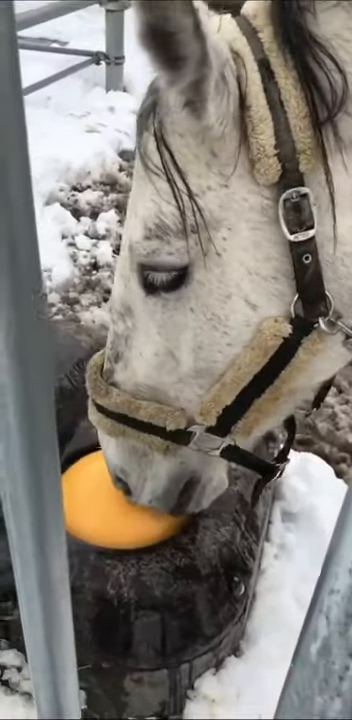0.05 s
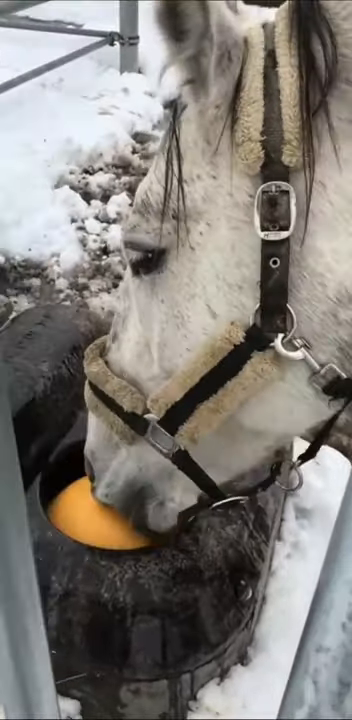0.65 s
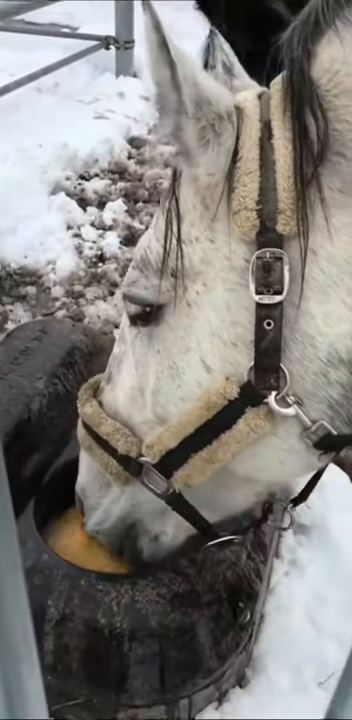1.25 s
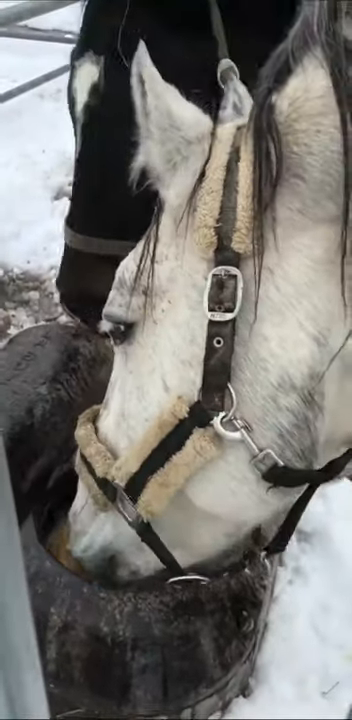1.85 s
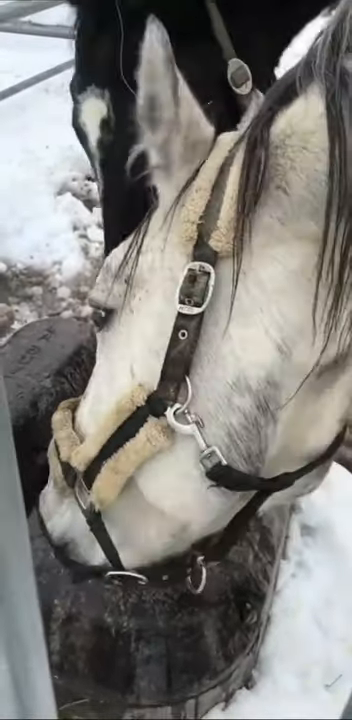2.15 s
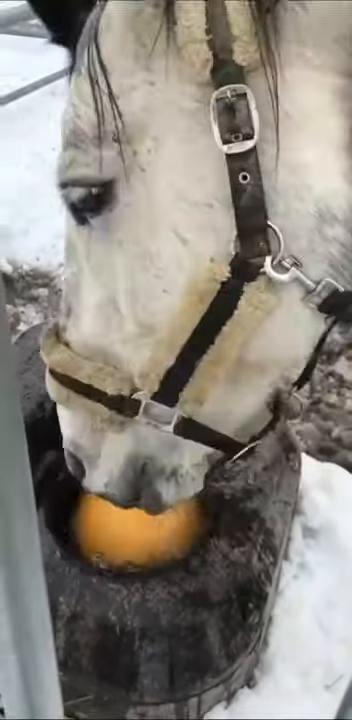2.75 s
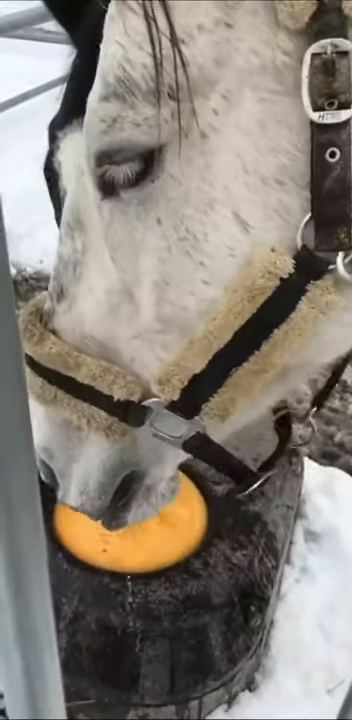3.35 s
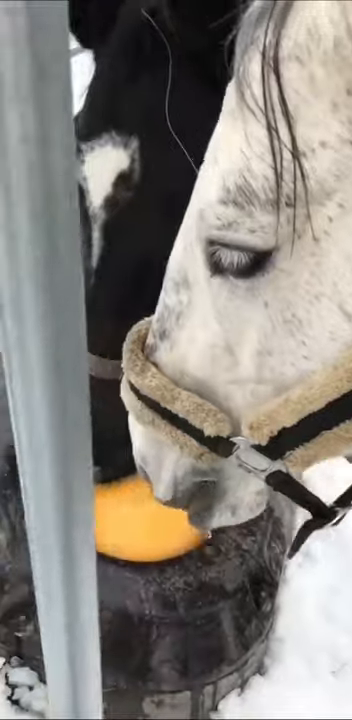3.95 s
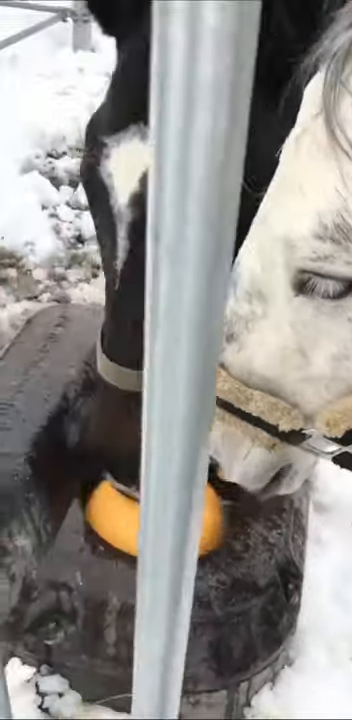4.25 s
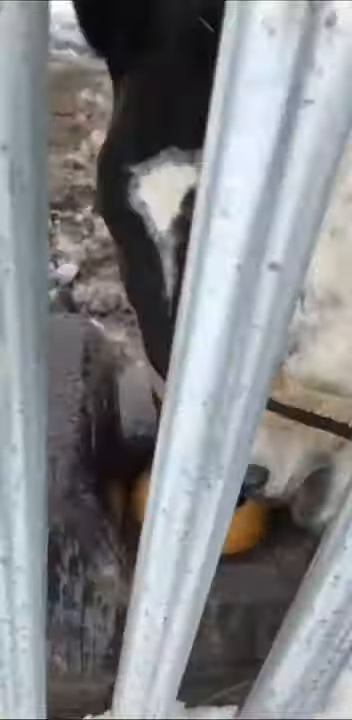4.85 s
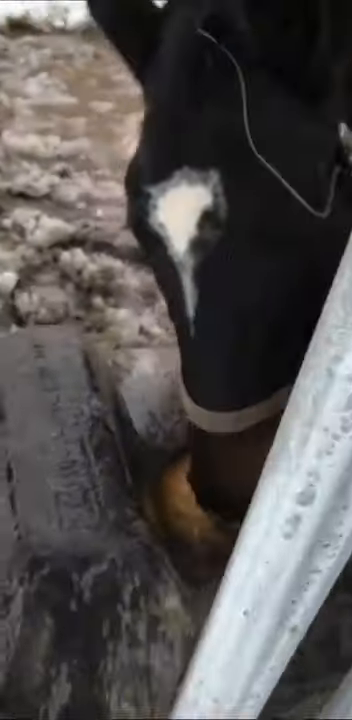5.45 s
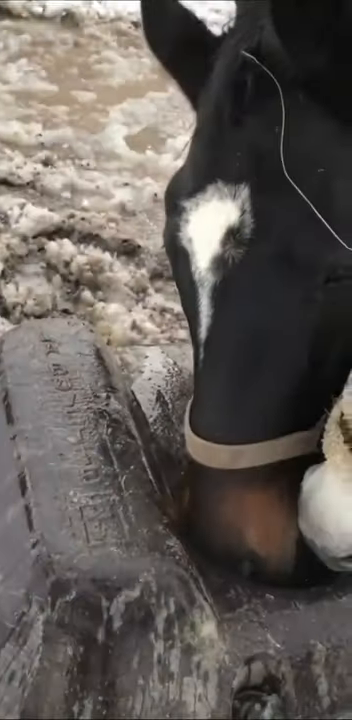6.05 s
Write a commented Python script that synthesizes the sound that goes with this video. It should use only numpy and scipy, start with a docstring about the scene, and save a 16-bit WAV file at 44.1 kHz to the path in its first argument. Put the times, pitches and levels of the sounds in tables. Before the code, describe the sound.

Two horses drink from a plastic ball drinker in a quiet winter paddock, heard from about a metre away. Water laps and plops while wet lips rub and smack. The ball knocks sharply on the rim and short, hissing slurps begin. Then the water churns and the hollow tank booms as the ball plunges. A second hard knock follows, and smacks, plops and lighter knocks carry on.

```python
"""Two horses drink from a plastic ball drinker in a snowy paddock, about a metre away.
Over quiet winter air, water laps and wet lips rub the bobbing ball; air pockets plop and lips smack.
At 0.7 s the nosed ball knocks on the rim, and short, hissing slurps begin. From 1.8 s the ball
plunges and the hollow tank booms. The water churns hardest near 2.4 s, a hard knock lands at 3.1 s
and the last slurp follows; smacks, plops and lighter knocks carry on to about 6 s."""
import sys
import numpy as np
from scipy import signal
from scipy.fft import rfft, irfft
from scipy.io import wavfile
from scipy.ndimage import uniform_filter1d, map_coordinates

SR = 44100
rng = np.random.default_rng(int(sys.argv[2]) if len(sys.argv) > 2 else 0)


def int16_out(signal):
    """Quantize to a 16-bit WAV file."""
    q = np.round(np.clip(np.atleast_2d(signal).T, -1, 1) * 32767)
    wavfile.write(sys.argv[1], SR, q.astype(np.int16))


N = 272538
T = np.arange(N) / SR
TOP_HZ = 9650

# Levels in the tables are cue levels, ahead of each layer's own trims.
# tone of the winter air: frequency_hz, level_db
AIR_SPECTRUM = [(25, 8.5), (60, 17.5), (150, 8.5), (400, 0.5), (1100, -0.5), (2200, -20.5), (5000, -36),
                (9800, -39.5)]
# how restless lips and water are between movements: time_s, level_db
UNREST_CURVE = [(0, -54), (.3, -55), (.66, -58), (.9, -50.5), (1.2, -63.5), (1.5, -55.5), (1.73, -58.5),
                (2.05, -50), (2.28, -64), (2.45, -52.5), (3.2, -47.5), (3.5, -54), (3.87, -52.5),
                (4.05, -46.5), (4.26, -56.5), (4.6, -51.5), (4.95, -57.5), (5.45, -56), (5.92, -57),
                (6.18, -52)]
# a muzzle shoves the water: start_s, length_s, splash_db, gurgle_db
MUZZLE_SHOVES = [(0.192, 0.17, -51, -54.5), (0.4, 0.12, -55.5, -56), (0.513, 0.047, -47.5, -50),
                 (0.74, 0.052, -57, -48), (0.943, 0.14, -51, -48.5), (1.228, 0.014, -47.5, -52),
                 (1.28, 0.035, -47, -48.5), (1.761, 0.017, -46.5, -48.5), (1.897, 0.06, -45.5, -54),
                 (2.021, 0.049, -46.5, -44.5), (2.165, 0.014, -51.5, -55.5), (2.338, 0.033, -35.5, -34),
                 (2.39, 0.059, -45, -50), (2.466, 0.032, -47.5, -37), (2.54, 0.045, -49.5, -40.5),
                 (2.585, 0.12, -42.5, -50), (2.884, 0.014, -43, -50.5), (3.026, 0.046, -45.5, -44.5),
                 (3.105, 0.031, -36.5, -47), (3.328, 0.038, -57, -47.5), (3.695, 0.044, -45.5, -49.5),
                 (3.852, 0.022, -47, -46.5), (3.897, .05, -63, -67), (4.027, 0.033, -43.5, -41),
                 (4.205, 0.02, -43.5, -47.5), (4.303, 0.0081, -44, -51), (4.513, 0.055, -49, -48.5),
                 (4.64, 0.014, -41, -37), (4.708, 0.018, -41, -41), (4.747, 0.072, -51, -46.5),
                 (4.82, 0.094, -56, -56.5), (4.985, 0.088, -52, -49), (5.109, 0.028, -68, -46),
                 (5.215, 0.031, -51, -45.5), (5.289, 0.098, -50, -43.5), (5.428, 0.24, -53, -54),
                 (6.013, 0.03, -66, -50)]
# wet lips rub over the ball: start_s, length_s, level_db
LIP_RUBS = [(.07, 0.12, -58.5), (.185, 0.17, -48.5), (.52, 0.056, -47.5), (.85, 0.23, -49.5),
            (1.09, 0.2, -59.5), (1.37, 0.21, -54.5), (1.58, 0.12, -60), (1.79, 0.33, -50.5),
            (2.36, 0.3, -49), (2.88, 0.19, -51), (3.115, 0.084, -40), (3.242, 0.011, -49.5),
            (3.34, 0.028, -44.5), (3.602, 0.02, -57), (3.65, 0.036, -51), (3.7, 0.021, -53),
            (3.99, 0.058, -50), (4.16, 0.034, -48), (4.365, 0.055, -48.5), (4.54, 0.022, -46.5),
            (4.71, 0.15, -52.5), (5.05, 0.049, -58), (5.12, 0.018, -49.5), (5.222, 0.02, -50.5),
            (5.29, 0.5, -52.5), (5.82, 0.056, -73), (5.63, 0.11, -52), (6.01, 0.21, -61.5)]
# tone of the wet hiss: frequency_hz, level_db
HISS_SPECTRUM = [(150, 2), (500, -30), (1000, 10.5), (1600, 0.5), (2300, 1), (3400, 1.5), (5000, -1.5),
                 (6200, -1), (7800, -5), (9800, -4.5)]
# the ball is pressed down and bobs on the tank's air: start_s, length_s, level_db
BALL_BOBS = [(.05, 0.077, -45.5), (.41, 0.048, -48.5), (1.67, 0.02, -51), (2.31, 0.1, -40),
             (2.47, 0.18, -45.5), (2.81, 0.028, -54), (2.98, 0.062, -47), (3.1, 0.095, -40),
             (3.62, 0.27, -47), (3.97, 0.14, -42.5), (4.45, 0.13, -45), (4.65, 0.087, -48),
             (5.03, 0.15, -49.5), (5.24, 0.17, -40.5)]
# larger air pockets close in the water; the rows near 3.91 s and 4.78 s are dull lip clicks that ring the same
# way: start_s, level_db, pitch_hz, t60_s
AIR_POCKETS = [(0.16, -45.5, 606, .035), (.207, -44, 1170, 0.028), (0.262, -45, 1190, 0.043),
               (0.301, -43, 1200, 0.02), (.32, -42, 1200, 0.021), (.418, -43, 850, 0.03),
               (.44, -48, 296, 0.09), (.458, -49, 348, 0.04), (.53, -45, 328, .05),
               (.547, -29.5, 1390, 0.011), (.551, -35, 1520, 0.015), (.553, -37.5, 284, .055),
               (.572, -63, 330, .04), (.604, -43.5, 215, .055), (0.621, -51, 1220, .025),
               (.759, -30.5, 466, 0.022), (.871, -44, 690, .025), (.956, -43, 970, 0.029),
               (.993, -38.5, 204, 0.033), (1.031, -39.5, 967, 0.03), (1.098, -37.5, 863, .03),
               (1.349, -41.5, 1060, .025), (1.784, -38, 800, 0.017), (1.92, -37, 1420, 0.021),
               (2.345, -31.5, 480, .03), (2.349, -35, 249, 0.045), (2.361, -29.5, 370, 0.06),
               (2.367, -31.5, 258, .045), (2.38, -35.5, 528, .06), (2.401, -35, 1222, 0.039),
               (2.421, -35, 1004, 0.027), (2.422, -44, 520, 0.046), (2.476, -29.5, 525, 0.038),
               (2.478, -42, 306, 0.032), (2.491, -33.5, 553, 0.051), (2.524, -30, 581, .045),
               (2.526, -34, 310, .05), (2.572, -34.5, 363, .045), (2.574, -37, 1220, .025),
               (2.625, -38, 690, .03), (2.649, -34, 378, .03), (2.651, -35.5, 850, .025),
               (2.654, -38.5, 1700, .025), (2.668, -32, 1306, .028), (2.887, -38.5, 1590, 0.021),
               (3.039, -40, 740, .025), (3.054, -36, 750, .025), (3.39, -37, 1290, 0.021),
               (3.697, -45, 1340, 0.023), (3.906, -41.5, 2180, .02), (4.035, -35.5, 1010, 0.0219),
               (4.048, -41, 1400, 0.026), (4.057, -39.5, 655, 0.028), (4.14, -35.5, 1430, 0.012),
               (4.147, -32, 1005, .018), (4.21, -38.5, 870, .035), (4.218, -34, 1020, 0.034),
               (4.229, -35.5, 785, 0.022), (4.313, -40.5, 910, 0.023), (4.326, -37, 915, 0.023),
               (4.59, -44, 840, 0.02), (4.653, -37, 385, 0.043), (4.657, -37, 260, .05),
               (4.713, -35, 867, .03), (4.725, -41, 260, .045), (4.759, -36.5, 307, 0.048),
               (4.782, -40.5, 1750, 0.02), (4.783, -41, 310, 0.041), (4.87, -44.5, 308, .06),
               (4.916, -45, 1090, 0.034), (4.922, -42, 1470, 0.025), (5.007, -43, 362, 0.04),
               (5.117, -33, 282, 0.025), (5.137, -39, 313, 0.05), (5.362, -40.5, 445, 0.041),
               (5.425, -38.5, 1520, 0.024), (5.435, -43, 1130, 0.023), (5.555, -41, 1320, 0.014),
               (5.613, -39.5, 268, 0.035)]
# lips and tongue part (a low Q snaps, a high Q squeaks):
# start_s, click_db, click_hz, mouth_db, mouth_hz, click_t60_s, click_q
LIP_SMACKS = [(.192, -46.5, 5960, -52, 1200, .025, 8), (.446, -48.5, 5550, -52, 1200, .013, 15),
              (.492, -47, 4400, -33, 877, .054, 10), (.693, -45, 3780, -38.5, 730, .014, 11),
              (.732, -37.5, 6300, -42, 1130, .014, 11), (.756, -33, 5390, -46, 460, .02, 20),
              (.8525, -42, 5430, -50, 1400, .006, 2.2), (1.286, -39.5, 5650, -45, 630, .025, 14),
              (1.475, -35, 3150, -41, 1210, .013, 5.1), (1.761, -38, 6500, -48, 1220, 0.021, 2.7),
              (1.841, -44, 3400, -57, 1500, .008, 5), (2.315, -32.5, 4450, -43, 1480, .011, 8.2),
              (2.692, -33, 3000, -33.5, 1080, 0.02, 6), (2.734, -35.5, 2760, -33, 1710, .021, 8.1),
              (2.764, -42, 7900, -46, 1190, .014, 10), (2.81, -39.5, 4600, -53, 517, .017, 14),
              (2.915, -40, 8550, -56, 1500, .019, 12), (2.9325, -31.5, 4400, -57, 1770, 0.01, 17),
              (3.108, -29.5, 4800, -24, 1350, .028, 8.8), (3.165, -42, 7000, -36, 1380, .015, 11),
              (3.603, -41.5, 2700, -48, 1010, .032, 7), (3.64, -43.5, 2610, -50, 940, .0073, 11),
              (3.653, -39.5, 2670, -48.5, 1030, .009, 11), (3.67, -41, 3860, -49, 1490, .018, 10),
              (3.702, -44, 3880, -50, 1300, .028, 11), (3.717, -36, 2830, -44, 1310, .014, 8),
              (3.964, -49, 5800, -55, 1370, .012, 11), (4.012, -44, 4020, -52, 895, .009, 8),
              (4.274, -45, 3450, -34, 2110, .02, 12), (4.288, -43.5, 4330, -40, 670, .02, 36),
              (4.307, -34.5, 4340, -34, 980, .024, 8.8), (4.328, -42.5, 3720, -55, 1510, .014, 18),
              (4.367, -43, 4150, -57, 1800, .03, 25), (4.383, -40, 4240, -47, 1800, .02, 33),
              (4.5436, -25, 3000, -29, 2000, 0.01, 1.8), (4.741, -42.5, 3950, -54, 900, .0083, 11),
              (4.7725, -28.5, 3600, -48, 1320, .008, 12), (4.784, -46, 2390, -49, 900, .012, 11),
              (4.815, -49, 4000, -46, 1410, .008, 4.6), (5.025, -40.5, 3600, -34, 530, .01, 3.9),
              (5.053, -48, 6600, -63, 700, .015, 11), (5.079, -44.5, 3050, -58, 590, .017, 12),
              (5.135, -43, 4550, -41.5, 1580, .036, 12), (5.192, -42, 4470, -50, 1920, .015, 14),
              (5.263, -44.5, 2180, -47, 1920, .018, 11), (5.285, -49, 4600, -45, 1290, .02, 20),
              (5.2922, -28.5, 3900, -31, 2010, 0.016, 1.3), (5.418, -46, 4870, -51, 1500, .015, 20),
              (5.4232, -33.5, 4930, -39, 1500, .02, 8.9), (5.49, -45.5, 5540, -56, 1510, .012, 13),
              (5.642, -31.5, 3320, -50, 1730, .008, 9.8), (5.67, -40, 6340, -52, 1500, .013, 11),
              (6.025, -44.5, 2450, -42, 1420, .014, 15), (6.063, -47.5, 4530, -68, 1500, .012, 12),
              (6.114, -44, 2730, -57, 1300, .018, 8.8)]
# the ball hits the rim, each spot favouring a range of pitches:
# start_s, ring_db, spot_hz, breadth_octaves, crack_db, decay_ratio
RIM_KNOCKS = [(0.7035, -12.5, 980, 0.58, -25.5, 1.03), (1.761, -31, 715, 0.45, -51, 1.6),
              (2.3124, -35.5, 415, 0.67, -44, 0.98), (2.482, -27, 706, 1.04, -63, 1.6),
              (3.112, -12.5, 1710, 0.23, -18, 1.4), (3.858, -31, 1550, 0.41, -74, 0.86),
              (4.225, -27, 1280, 1.13, -43, 0.92), (4.5438, -21.5, 1900, 3.4, -32, 0.45),
              (4.6415, -30.5, 850, 1.2, -47, 1.6), (4.7112, -31.5, 980, 1.2, -44, 0.59),
              (4.755, -35, 1400, 1.6, -61, 1.9), (4.806, -37, 600, 1.3, -48, 0.99),
              (5.730, -34, 746, 0.95, -43, 1.1), (5.7352, -37, 895, 0.64, -59, 0.9),
              (5.825, -35.5, 815, 0.66, -44, 0.41)]
# resonances of the wet plastic ball and rim: pitch_hz, level_db, t60_s
PLASTIC_MODES = [(381, 6, 0.13), (511, 9.5, 0.041), (653, 10, 0.018), (772, 8, 0.019), (960, 24, 0.0045),
                 (1160, 7.5, 0.02), (1238, 12.5, 0.015), (1445, 1.5, 0.058), (1586, 10.5, 0.022),
                 (1810, -21, 0.0096), (2240, 18.5, 0.013), (2870, -1, 0.012), (3600, 27, 0.011),
                 (4200, -19, 0.018)]
# air and water drawn through the lips, whose opening scales the gap's pitches:
# start_s, length_s, level_db, fall_db, opening_ratio
SLURPS = [(0.75, 0.028, -33.5, 0.5, 0.94), (0.927, 0.065, -43.5, -2.5, 0.94),
          (1.029, 0.048, -42, -0.5, 0.83), (1.288, 0.1, -37, 7.5, 0.86), (1.758, 0.031, -40, 6, 0.96),
          (1.858, 0.095, -43, -4, 0.92), (2.038, 0.054, -55, -12.5, 0.89), (2.344, 0.056, -46, -10, 1.2),
          (3.367, 0.026, -39.5, -3.5, 1.7)]
# resonances of the wet gap between lips and ball: pitch_hz, q, level_db
LIP_GAP_MODES = [(523, 4.4, 1), (1006, 3.9, 9.5), (1400, 6.7, -1), (3500, 5, 2), (4400, 4.3, -1.5),
                 (5570, 11, -9), (7250, 3.4, -8.5), (9130, 23, 2.5)]
# the ball plunges and the tank's air booms: start_s, pitch_hz, level_db, t60_s
TANK_BOOMS = [(1.764, 113, -43, 0.071), (2.041, 147, -32, 0.078), (2.091, 158, -38, 0.097),
              (2.31, 175, -30, 0.023), (2.352, 104, -27.5, 0.067), (2.483, 116.5, -25, 0.1),
              (2.538, 113, -29.5, 0.065), (2.575, 105, -40.5, 0.11), (3.117, 166, -25, 0.046),
              (3.118, 224, -27.5, 0.068), (3.139, 159.6, -19, 0.11), (3.35, 69.4, -31, 0.18),
              (4.035, 78.4, -38, 0.14), (4.065, 62, -29.5, 0.17), (4.229, 70.3, -39.5, 0.23),
              (4.656, 71, -31.5, 0.15), (4.733, 71, -34.5, 0.24), (5.61, 165, -40.5, 0.044),
              (5.731, 199, -40, 0.038), (5.827, 194, -42, 0.049)]


def undb(db):
    """Decibels to gain."""
    return 10 ** (np.asarray(db) / 20)


def unit(x):
    """Scale to rms 1."""
    return x / np.sqrt(np.mean(x ** 2))


def burst(x, db):
    """Scale a one-shot so that its loudest 5 ms have this level."""
    return x * undb(db) / np.sqrt(uniform_filter1d(x ** 2, 220).max())


def add(out, start_s, x):
    """Mix x into out from start_s."""
    i = int(np.clip(start_s * SR, 0, N - 1))
    out[i:i + len(x)] += x[:N - i]


def fade(t, t60):
    """Exponential decay by 60 dB in t60."""
    return np.exp(-np.log(1000) * t / t60)


def attack(t, rise_s):
    """Rounded onset from 0 towards 1."""
    return 1 - np.exp(-(t / rise_s) ** 2)


def band(x, hz, q):
    """One resonance, gain 1 at its centre."""
    return signal.lfilter(*signal.iirpeak(min(hz, SR / 4), max(q, .5), fs=SR), x)


def coloured_noise(samples, spectrum):
    """Noise shaped by an EQ curve, at rms 1."""
    hz, db = np.transpose(spectrum)
    bins_hz = np.maximum(np.fft.rfftfreq(samples, 1 / SR), 1)
    eq = undb(np.interp(np.log(bins_hz), np.log(hz), db))
    return unit(irfft(rfft(rng.standard_normal(samples)) * eq, samples))


def walk(rate_hz):
    """Smooth random drift at rms 1."""
    hold = int(SR / rate_hz)
    steps = np.repeat(rng.standard_normal(N // hold + 1), hold)[:N]
    return unit(uniform_filter1d(uniform_filter1d(steps, hold), hold))


def contact(t, rise_s, t60, tail_db, tail_t60):
    """A gritty wet contact: a fast burst of noise and a weak spatter after it."""
    envelope = attack(t, rise_s) * (fade(t, t60) + undb(tail_db) * fade(t, tail_t60))
    return envelope * rng.standard_normal(len(t))


def bubble(hz, cycles, glide):
    """An air pocket rings for some cycles, its pitch rising as it nears the surface."""
    t60 = cycles / hz
    t = T[:int(t60 * SR) + 2]
    phase = 2 * np.pi * hz * t * (1 + glide * t / t60 / 2)
    return np.sin(phase) * fade(t, t60) * (1 - np.exp(-t * hz * 2))


def bubble_stream(low_hz, high_hz, cycles, glide, spread_db, count):
    """A bed of small bubbles of random pitch and size, at rms 1."""
    out = np.zeros(N)
    for when, pitch, chance in rng.random((count, 3)):
        hz = low_hz * (high_hz / low_hz) ** pitch
        size_db = -spread_db * np.log(max(chance, .03))
        add(out, when * N / SR, undb(size_db) * np.sqrt(hz) * bubble(hz, cycles, glide))
    return unit(out)


def crackle(low_hz, high_hz, spread_db, count):
    """Small films of water tear one by one, each with its own pitch and size, at rms 1."""
    out = np.zeros(N)
    for when, pitch, chance in rng.random((count, 3)):
        hz = low_hz * (high_hz / low_hz) ** pitch
        size_db = -spread_db * np.log(max(chance, .05))
        snap = band(contact(T[:1024], .001, .012, -30, .03), hz, q=4)
        add(out, when * N / SR, burst(snap, size_db))
    return unit(out)


def strokes(cues, rise_s, t60):
    """Envelope of a run of movements: each builds, holds and dies away."""
    power = np.zeros(N)
    for start_s, length_s, db in cues:
        t = T[:int((length_s + t60) * SR)]
        envelope = np.minimum(t / rise_s, 1) * fade(np.maximum(t - length_s, 0), t60)
        add(power, start_s, (undb(db) * envelope) ** 2)
    return np.sqrt(power)


def unrest():
    """Envelope of the small stirrings between movements."""
    return undb(np.interp(T, *np.transpose(UNREST_CURVE)))


def winter_air(level_db=-61):
    """A quiet, dark bed of air whose level drifts slightly."""
    return coloured_noise(N, AIR_SPECTRUM) * undb(level_db + walk(5))


def water_churn(surface_lap_db=-6.5, deep_lap_db=-8):
    """Water laps; each shove stirs small bubbles at the surface and larger ones under the ball."""
    shoves = np.array(MUZZLE_SHOVES)
    surface = strokes(shoves[:, [0, 1, 2]], rise_s=.0039, t60=.18)
    deep = strokes(shoves[:, [0, 1, 3]], rise_s=.0039, t60=.18)
    splash = bubble_stream(550, 2000, cycles=18, glide=.15, spread_db=3.2, count=2000)
    gurgle = bubble_stream(140, 600, cycles=7, glide=.15, spread_db=3, count=1400)
    splash *= np.hypot(surface, undb(surface_lap_db) * unrest())
    gurgle *= np.hypot(deep, undb(deep_lap_db) * unrest())
    return splash + gurgle


def lip_rubs(rest_db=-2, flutter_db=3.5, hiss_db=-1.95, crackle_db=-9, fizz_db=-9):
    """Wet lips hiss, crackle and fizz with tiny bubbles, louder as they rub over the ball."""
    rubbing = strokes(LIP_RUBS, rise_s=.0011, t60=.13)
    hiss = coloured_noise(N, HISS_SPECTRUM) * undb(flutter_db * walk(60))
    films = crackle(1500, 9500, spread_db=3.7, count=440)
    fizz = bubble_stream(2200, 9500, cycles=110, glide=.02, spread_db=2.7, count=2000)
    texture = undb(hiss_db) * hiss + undb(crackle_db) * films + undb(fizz_db) * fizz
    return texture * np.hypot(undb(rest_db) * unrest(), rubbing)


def ball_bobs(tank_hz=65, waver=.1516, rest_db=-87, slop_db=-9):
    """The tank's lowest air note wavers as the gap round the ball opens and shuts; water slops."""
    motion = np.hypot(strokes(BALL_BOBS, rise_s=.016, t60=.4), undb(rest_db))
    phase = 2 * np.pi * np.cumsum(tank_hz * (1 + waver * walk(45))) / SR
    slop = band(rng.standard_normal(N), hz=100, q=3.4)
    slop = unit(band(slop, hz=100, q=3.4))
    rumble = unit(np.sin(phase) * undb(3.8 * walk(30)))
    return (rumble + undb(slop_db) * slop) * motion


def water_plops(glide=.076, twin_db=-9, splash_db=-11):
    """An air pocket pinches off and sings a rising note, with a smaller twin and a little splash."""
    out = np.zeros(N)
    twins = rng.random((len(AIR_POCKETS), 2))
    for (start_s, db, hz, t60), (smaller, later) in zip(AIR_POCKETS, twins):
        note = bubble(hz, hz * t60, glide)
        note *= attack(T[:len(note)], .056 * t60)
        add(out, start_s, burst(note, db))
        twin = bubble(hz * (1.2 + .6 * smaller), hz * t60, glide)
        add(out, start_s + .27 * t60 * later, burst(twin, db + twin_db))
        splash = band(contact(T[:4096], .003, .04, -30, .09), hz * 1.3, q=1.8)
        add(out, start_s, burst(splash, db + splash_db))
    return out


def lip_smacks(upper_db=-5, spray_db=-6, droplet_db=-8, shred_db=-12, hollow_db=-3, pop_db=-9.5):
    """A water film snaps: a bright click and tiny bubbles, answered by the hollow between the lips."""
    out, t = np.zeros(N), T[:4096]
    for start_s, click_db, click_hz, mouth_db, mouth_hz, t60, q in LIP_SMACKS:
        # the quicker the film tears, the sharper the click
        snap = contact(t, .024 * t60, t60, -26, .047)
        spray = contact(t, .067 * t60, t60, -28.5, .068)
        # the lip slit rings at its own pitch and, more weakly, at two higher ones
        ratios = rng.uniform([1.3, 1.9], [1.7, 2.6])
        upper = sum(band(spray, min(click_hz * ratio, .95 * TOP_HZ), q) for ratio in ratios)
        click = unit(band(snap, click_hz, q)) + undb(upper_db) * unit(upper)
        click += undb(spray_db) * unit(band(spray, hz=7300, q=2.1))
        add(out, start_s, burst(click, click_db))
        for pitch, delay in rng.random((3, 2)):
            droplet = bubble(2200 * 4 ** pitch, cycles=90, glide=.03)
            add(out, start_s + .37 * t60 * delay, burst(droplet, click_db + droplet_db))
        # shreds of the film tear after the main snap
        for pitch, delay in rng.random((2, 2)):
            shred = band(contact(t[:512], .0002, .004, -30, .01), click_hz * (.6 + pitch), q=8)
            add(out, start_s + t60 / 2 + .022 * delay, burst(shred, click_db + shred_db))
        hollow = band(contact(t, .001, .025, -22, .05), mouth_hz, q=5)
        add(out, start_s, burst(hollow, mouth_db + hollow_db))
        # the hollow opens as the lips part, so its pitch flicks upward
        pop = bubble(mouth_hz, cycles=39, glide=.11)
        add(out, start_s + .00072, burst(pop, mouth_db + pop_db))
    return out


def rim_knocks(cushion_s=.000896, scrape=.025, rebound=.18, rebound_s=.0063, crack_trim_db=-1):
    """Each blow rings the modes near the struck spot's pitch, with a crack of plastic on top."""
    out, t = np.zeros(N), T[:8192]
    for start_s, ring_db, spot_hz, octaves, crack_db, decay_ratio in RIM_KNOCKS:
        ring = np.zeros(len(t))
        for hz, mode_db, t60 in PLASTIC_MODES:
            weight = undb(mode_db) / (1 + (np.log2(hz / spot_hz) / octaves) ** 2) ** 2
            ring += weight * np.cos(2 * np.pi * hz * (t - cushion_s)) * fade(t, t60 * decay_ratio)
        ring *= attack(t, cushion_s)  # a film of water cushions the push
        # the ball hits, skids briefly on the rim and touches once more
        force = scrape * contact(t, .00047, .013, -41.5, .1)
        force[0] += 1
        force[int(rebound_s * SR)] += rebound
        knock = signal.fftconvolve(force, ring)[:len(t)]
        add(out, start_s, burst(knock, ring_db))
        crack = band(contact(t, .0006, .021, -40, .079), hz=2560, q=.5)
        add(out, start_s, burst(crack, crack_db + crack_trim_db))
    return out


def sputter(rate_hz, spread_db):
    """Envelope of air breaking through water in uneven little spurts, at rms 1."""
    cycle = np.cumsum(rate_hz * undb(4 * walk(300))) / SR
    sizes = undb(spread_db * rng.standard_normal(8192))
    spurts = sizes[cycle.astype(int) % 8192] * np.exp(-(cycle % 1))
    return unit(uniform_filter1d(spurts, size=16))


def slurps(rise_s=.003, release_s=.031, hiss_db=-9, froth_db=-6, crackle_db=-10, waver=.034):
    """Each draw opens abruptly: a frothy, sputtering rush rings the quivering gap at the lips."""
    out = np.zeros(N)
    rasp = sputter(rate_hz=320, spread_db=.6)
    quiver = 1 + waver * walk(40)
    froth = undb(froth_db) * bubble_stream(1700, 7500, cycles=130, glide=.06, spread_db=3, count=1500)
    films = undb(crackle_db) * crackle(1500, 8000, spread_db=3.5, count=800)
    for start_s, length_s, db, fall_db, opening in SLURPS:
        t = T[:int((length_s + release_s) * SR)]
        now = slice(int(start_s * SR), int(start_s * SR) + len(t))
        noise = rng.standard_normal(len(t))
        gap = sum(undb(mode_db) * band(noise, hz * opening, q) for hz, q, mode_db in LIP_GAP_MODES)
        gap = map_coordinates(gap, [np.cumsum(quiver[now])], mode="mirror")  # varispeed wobble
        hiss = undb(hiss_db) * coloured_noise(len(t), HISS_SPECTRUM)
        rush = unit(unit(gap) + hiss + froth[now] + films[now])
        gate = np.clip(np.minimum(t / rise_s, (t[-1] - t) / release_s), 0, 1)
        add(out, start_s, rush * gate * undb(db - fall_db * t / length_s))
    return out * rasp


def tank_booms(swell_cycles=.3, overtone_ratio=1.616, overtone_db=-13):
    """The tank's air swells quickly and dies away; a weaker, higher cavity mode joins in."""
    out, t = np.zeros(N), T[:16384]
    for start_s, hz, db, t60 in TANK_BOOMS:
        phase = 2 * np.pi * hz * t
        tone = np.sin(phase) + undb(overtone_db) * np.sin(overtone_ratio * phase)
        envelope = attack(t, swell_cycles / hz) * fade(t, t60)
        add(out, start_s, burst(tone * envelope, db))
    return out


def with_reflections(x, wet_db=-20, t60=.032):
    """Add weak, quick reflections from the tank, the animals and the fence."""
    t = T[:8192]
    echoes = band(rng.standard_normal(len(t)), hz=1000, q=.5)
    echoes *= fade(t, t60) * (1 - np.exp(-t / .006))
    return x + undb(wet_db) * signal.fftconvolve(x, echoes / np.linalg.norm(echoes))[:N]


def scene():
    """Ball, water and mouths over quiet winter air, in mono."""
    ball_and_tank = rim_knocks() + tank_booms() + ball_bobs()
    water = water_plops() + water_churn()
    mouths = lip_smacks() + slurps() + lip_rubs()
    air = winter_air()
    return (with_reflections(ball_and_tank + water + mouths) + air)[None]


def record(dry):
    """Master EQ: thin the deepest bass and cut the top steeply."""
    low_cut = signal.butter(2, 38, "high", fs=SR, output="sos")
    high_cut = signal.ellip(12, .2, 70, TOP_HZ, fs=SR, output="sos")
    return signal.sosfilt(high_cut, signal.sosfilt(low_cut, dry))


dry = scene()
out = record(dry)
int16_out(out)
```